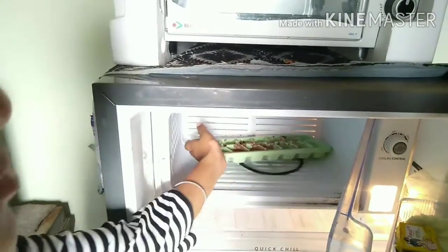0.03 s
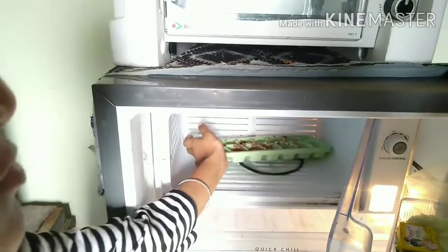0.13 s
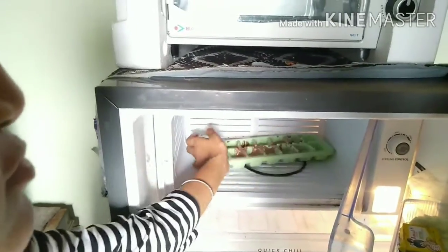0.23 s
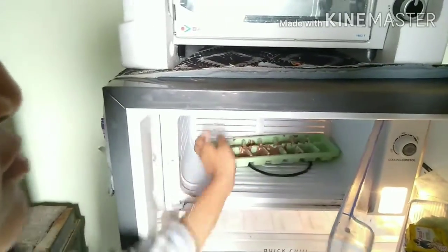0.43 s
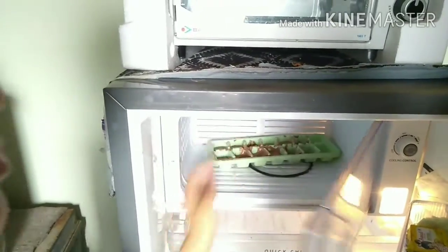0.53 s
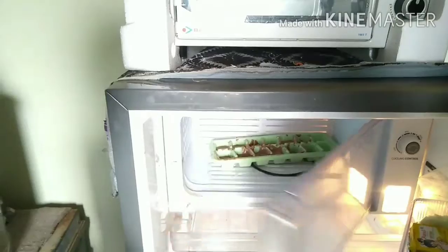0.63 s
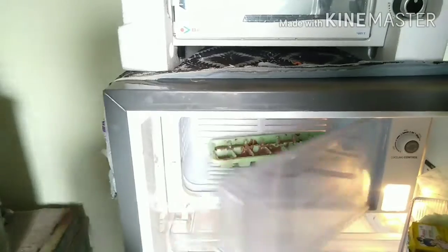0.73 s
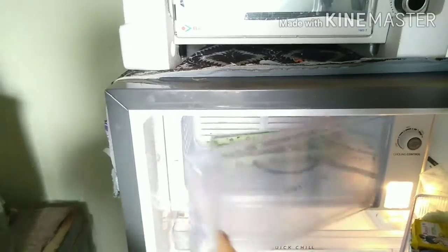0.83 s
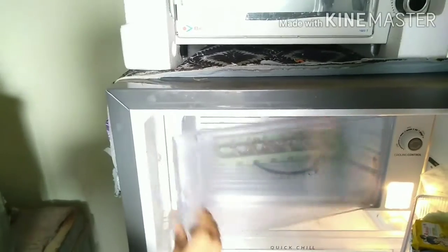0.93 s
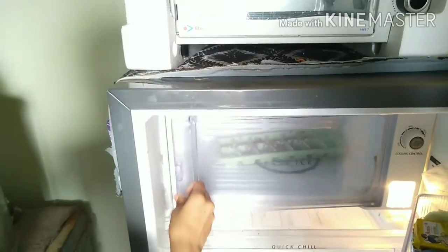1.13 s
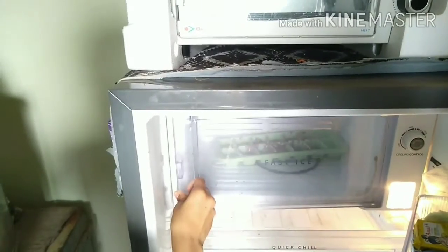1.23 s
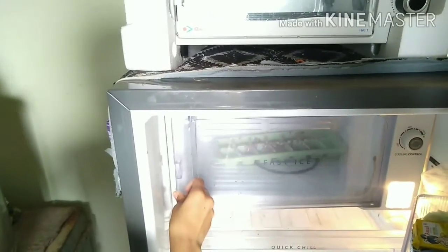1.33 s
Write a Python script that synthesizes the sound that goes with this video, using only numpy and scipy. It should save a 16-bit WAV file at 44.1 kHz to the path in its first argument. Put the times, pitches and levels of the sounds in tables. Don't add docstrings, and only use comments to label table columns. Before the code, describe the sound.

Close phone pickup in a hard, reverberant kitchen: a loud hollow plastic tray clatter, a short lull with soft rustles over low fridge hum, then a lighter flap knock with chatter and a faint latch click.

```python
import sys
import numpy as np
from scipy import signal
from scipy.fft import rfft, irfft
from scipy.io import wavfile
from scipy.ndimage import uniform_filter1d, map_coordinates

SR = 44100
rng = np.random.default_rng(int(sys.argv[2]) if len(sys.argv) > 2 else 0)


def log_audio(samples):
    frames = np.atleast_2d(samples).T
    limited = np.clip(frames, -1, 1)
    pcm = np.round(limited * 32767).astype(np.int16)
    wavfile.write(sys.argv[1], SR, pcm)


def nominal_scale(level):
    x = np.asarray(level, float) / 20
    return 10 ** x


N = 61739


def table(rows, hz, column=1):
    rows = np.array(rows, float)
    return np.interp(np.log(np.maximum(hz, 1)), np.log(rows[:, 0]), rows[:, column])


def unit(x):
    return x / np.sqrt(np.mean(x ** 2))


def noise(gain):
    spectrum = rfft(rng.standard_normal(N))
    return unit(irfft(spectrum * gain(np.fft.rfftfreq(N, 1 / SR)), N))


def band(hz, width_hz):
    return noise(lambda f: 1 / (1 + ((f - hz) / width_hz * 2) ** 2))


def walk(rate_hz):
    k = int(SR / rate_hz)
    steps = np.repeat(rng.standard_normal(N // k + 1), k)
    return unit(uniform_filter1d(uniform_filter1d(steps, k), k)[:N])


# frequency in Hz, level in dB.
HISS_COLOUR = [(25, -3), (70, -6.5), (200, -5.5), (600, -9), (1200, -12), (2800, -22), (11500, -29.5),
               (14000, -25)]
# centre in Hz, width in Hz, level in dB rms.
HUM_BANDS = [(100.6, 13, -72.5), (182.3, 14, -72), (238.7, 6.3, -76), (7900, 1900, -75), (14700, 900, -104),
             (3795, 73, -85.5)]


def hiss():
    swell_db = 0.4 * walk(7.1)
    edges_hz = [0, 150, 400, 1000, 2500, 6000, SR]
    freqs = np.fft.rfftfreq(N, 1 / SR)
    whole = rfft(noise(lambda f: nominal_scale(table(HISS_COLOUR, f))))
    bed = np.zeros(N)
    for lo, hi in zip(edges_hz, edges_hz[1:]):
        region = irfft(whole * (freqs >= lo) * (freqs < hi), N)
        bed += nominal_scale(swell_db + 0.7 * walk(12.5)) * region
    hum = sum(nominal_scale(db + 0.72 * walk(9.2)) * band(hz, width_hz) for hz, width_hz, db in HUM_BANDS)
    return nominal_scale(-59 - 2.5) * bed + hum


# centre in Hz, width in Hz, level in dB rms, strongest at in seconds, spread in seconds.
FAR_WHISTLE = (12050, 250, -83, .45, .33)


def whistle():
    hz, width_hz, db, peak_s, spread_s = FAR_WHISTLE
    flutter = nominal_scale(1.5 * walk(25))
    swell = np.exp(-.5 * ((np.arange(N) / SR - peak_s) / spread_s) ** 2)
    return nominal_scale(db) * flutter * band(hz, width_hz) * swell


def knocks(hits, modes, colour):
    LONGEST_T60_S, CRACK_T60_S, PUSH_S = 0.14, 0.03, 0.00041
    SCATTER_DB, FOCUS_DB_PER_OCT, MIC_LOW_HZ = 3, 12.5, 111
    out, t = np.zeros((2, N)), np.arange(N) / SR
    hz, mode_db, t60_s = (np.array(modes, float).T)[:, :, None]
    t60_s = np.clip(t60_s, .01, LONGEST_T60_S)
    crack = noise(lambda f: nominal_scale(table(colour, f)))
    for start_s, ring_db, focus_hz, crack_db in hits:
        mix, detune = rng.standard_normal((2, len(hz), 1))
        i = int(start_s * SR)
        u = t[i:i + SR // 2] - i / SR
        octaves_off = np.abs(np.log2(hz / focus_hz))
        share = nominal_scale(mode_db + SCATTER_DB * mix - FOCUS_DB_PER_OCT * octaves_off)
        tones = np.sin(2 * np.pi * hz * (1 + 0.0086 * detune) * u)
        rise = 1 - np.exp(-u * hz)
        ring = (share * tones * 1000. ** (-u / t60_s) * rise).sum(axis=0)
        snap = crack[i:i + len(u)] * 1000. ** (-u / CRACK_T60_S)
        push = 1 - np.exp(-u / PUSH_S)
        out[:, i:i + len(u)] += np.array([nominal_scale(ring_db) * ring, nominal_scale(crack_db) * snap]) * push
    return signal.sosfilt(signal.butter(2, MIC_LOW_HZ, "high", fs=SR, output="sos"), out)


# start in seconds, ring peak in dB, favoured pitch in Hz, crack in dB.
CORNER_HITS = [
    (.1778, -29, 470, -37.5),
    (.1806, -42, 470, -52),
    (.191, -36, 130, -55),
]
# frequency in Hz, level in dB, t60 in seconds.
CORNER_MODES = [(124.6, 4.5, 0.22), (226, -5, 0.077), (448, -0.5, 0.084), (695, -1, 0.038),
                (1053, 2, 0.058), (2000, 3, .04), (3550, 12, .035)]
# frequency in Hz, level in dB per Hz.
CORNER_CRACK = [(200, -1), (1000, 0), (2500, -6), (5000, -4.5), (7500, -6.5), (10000, -20), (13000, -14),
                (15700, -27)]


def corner_touch():
    return knocks(CORNER_HITS, CORNER_MODES, CORNER_CRACK)


# start in seconds, level in dB rms, centre in Hz, width in Hz, fade in seconds.
RUBS = [(.509, -59, 7000, 1200, .009), (.511, -66, 12050, 400, .012), (.796, -58, 1600, 800, .034),
        (.74, -60, 220, 140, .04), (.972, -71, 6000, 2000, .008), (1.022, -64, 1970, 160, .022),
        (1.055, -64, 1990, 110, .04), (1.382, -57, 15000, 1200, .003), (1.147, -57, 14800, 1400, .005),
        (.208, -48, 14900, 900, .006), (1.046, -60, 7500, 2500, .012), (.178, -54, 3500, 300, .006)]


def rustles():
    t, out = np.arange(N) / SR, np.zeros(N)
    for start_s, db, hz, width_hz, fade_s in RUBS:
        rise = np.clip((t - start_s) / 0.0016, 0, 1)
        fade = np.exp(-np.maximum(t - start_s, 0) / fade_s)
        out += nominal_scale(db) * band(hz, width_hz) * rise * fade
    return out


# frequency in Hz, t60 in seconds, level in dB.
KITCHEN_DECAY = [(107, 1, 1), (285, 0.78, -3.5), (600, 0.56, 5.5), (1500, 0.64, 0.5), (3450, 0.46, -0.5),
                 (6850, 0.36, -9), (14100, 0.21, 7.5)]


def kitchen():
    FIRST_ECHO_S, BUILD_S = 0.0053, 0.012
    t, out = np.arange(N) / SR, np.zeros(N)
    for hz in 60 * 2 ** (np.arange(25) / 3):
        level = np.sqrt(hz) * nominal_scale(table(KITCHEN_DECAY, hz, column=2))
        out += band(hz, hz / 4) * level * 1000. ** (-t / table(KITCHEN_DECAY, hz))
    out = out * np.clip((t - FIRST_ECHO_S) / BUILD_S, 0, 1)
    return out / np.sqrt(np.sum(out ** 2))


def echoes(knock, wet_db):
    ring_db, crack_db = -6, 4
    return nominal_scale(wet_db) * signal.fftconvolve(nominal_scale(np.array([ring_db, crack_db])) @ knock, kitchen())


# start in seconds, ring peak in dB, favoured pitch in Hz, crack in dB.
RATTLE_HITS = [(.2037, -29, 1400, -30.5), (.2096, -13, 1085, -21.5), (.2132, -19, 1130, -30.5),
               (.2145, -23.5, 680, -47), (.2165, -20, 487, -39), (.2205, -31, 1470, -21),
               (.2275, -24, 600, -33.5), (.2395, -17.5, 557, -32.5), (.2445, -37, 1660, -36),
               (.257, -27.5, 228, -34.5), (.2676, -31, 1100, -56), (.262, -28, 228, -62),
               (.212, -28.5, 134, -65), (.277, -22.5, 500, -49), (.282, -32, 1140, -39),
               (.2305, -29, 1040, -36), (.292, -37, 1080, -44), (.301, -29.5, 523, -49),
               (.322, -30, 497, -59), (.336, -38.5, 1160, -64), (.365, -40, 793, -67),
               (.388, -40, 1030, -53), (.385, -42, 125, -66)]
# frequency in Hz, level in dB, t60 in seconds.
RATTLE_MODES = [(116.3, 5, 0.17), (228, -3, 0.12), (345, -6, 0.037), (470, -2.5, 0.05), (529.5, -5, 0.13),
                (662, -19, 0.036), (793, -4.5, 0.063), (1058.6, -12, 0.16), (1121, -1.5, 0.039),
                (1420, -0.5, 0.035), (1630, -6, 0.058), (1970, -7.5, 0.08), (2570, -10, 0.043),
                (3320, -10, 0.026)]
# frequency in Hz, level in dB per Hz.
RATTLE_CRACK = [(100, -9.5), (500, 3), (1200, -3), (2500, -13), (6000, -18.5), (8500, -18.5),
                (12500, -29.5), (15200, -36.5)]


def tray_rattle():
    return knocks(RATTLE_HITS, RATTLE_MODES, RATTLE_CRACK)


# time in seconds, pitch in Hz, level in dB.
HINGE_HUM = [
    (.58, 339, -84),
    (.63, 343, -62),
    (.72, 345, -67),
    (0.801, 368, -63),
    (.92, 392.7, -66),
    (1.0, 403.5, -67),
    (1.07, 392.7, -61.5),
    (1.13, 402, -66),
    (1.161, 395, -100),
]
# multiple of the pitch, level in dB, strongest at in seconds, spread in seconds.
HINGE_OVERTONES = [(2, -3, .96, .03), (2, -5, 1.085, .03), (2, -4, .84, .02), (3, -7, .9, .04),
                   (5, -12, 1.033, .01), (5, -14, 1.07, .02)]


def hinge():
    t, (knot_s, knot_hz, knot_db) = np.arange(N) / SR, np.array(HINGE_HUM).T
    pitch_hz = np.interp(t, knot_s, knot_hz) * (1 + 0.00633 * walk(60.9))
    phase = 2 * np.pi * np.cumsum(pitch_hz) / SR
    tone = np.sin(phase) * nominal_scale(1.7 * walk(6.64))
    for multiple, db, peak_s, spread_s in HINGE_OVERTONES:
        level = nominal_scale(db + 4.5 + 2 * walk(47.9))
        swell = np.exp(-.5 * ((t - peak_s) / spread_s) ** 2)
        tone = tone + level * swell * np.sin(round(multiple) * phase)
    return tone * nominal_scale(np.interp(t, knot_s, knot_db, left=-120, right=-120))


# start in seconds, ring peak in dB, favoured pitch in Hz, crack in dB.
FRAME_HITS = [(1.1478, -31.5, 1720, -32.5), (1.1495, -35.5, 4400, -35.5), (1.1512, -30.5, 1700, -36.5),
              (1.155, -22.5, 470, -42), (1.1572, -24, 1540, -46), (1.1625, -32, 1020, -38.5),
              (1.165, -32, 1740, -44.5), (1.173, -50, 2750, -37.5), (1.1763, -25, 492, -49),
              (1.186, -36.5, 218, -40), (1.199, -36, 600, -44), (1.228, -43.5, 1745, -63),
              (1.232, -41, 480, -65), (1.275, -48, 550, -64)]
# frequency in Hz, level in dB, t60 in seconds.
FRAME_MODES = [(130, 2.5, .14), (213, 4.5, 0.15), (451, -4, 0.082), (486, 1.5, 0.039), (594, -4.5, 0.13),
               (1020, -11.5, 0.075), (1540, -0.5, 0.039), (1757, -3.5, 0.069), (2720, -18, 0.013),
               (3430, -2, 0.034), (4400, 3.5, 0.022), (4944, 0, .02), (6800, 9, 0.017), (7980, 7.5, 0.016)]
# frequency in Hz, level in dB per Hz.
FRAME_CRACK = [(100, -5.5), (450, -3.5), (800, -6.5), (2200, -3), (4800, -8.5), (8000, -15.5),
               (11000, -33.5), (15700, -41)]


def flap_knock():
    return knocks(FRAME_HITS, FRAME_MODES, FRAME_CRACK)


# start in seconds, ring peak in dB, favoured pitch in Hz, crack in dB.
CATCH_HITS = [
    (1.3836, -51, 1500, -43),
    (1.3852, -45, 1800, -44),
    (1.388, -43, 1010, -48),
    (1.391, -40, 1350, -48.5),
    (1.3938, -28.5, 1370, -52),
    (1.3965, -36, 1000, -52),
]
# frequency in Hz, level in dB, t60 in seconds.
CATCH_MODES = [(1024, -1, 0.054), (1370, -0.5, 0.031), (1800, -2, 0.043), (420, -8, .07), (233, 8, 0.072),
               (586, -4, .05)]
# frequency in Hz, level in dB per Hz.
CATCH_CRACK = [(300, 4.5), (1600, -2), (2850, -13), (5300, -18), (6800, -9.5), (9000, -21.5),
               (13000, -22.5), (15200, -21)]


def latch():
    return knocks(CATCH_HITS, CATCH_MODES, CATCH_CRACK)


# centre in Hz, width in Hz, lift in dB.
PORT_PEAKS = [(15500, 760, 12.5), (8030, 1400, 3.5), (6240, 200, 4)]


def port(x):
    for hz, width_hz, db in PORT_PEAKS:
        b, a = signal.iirpeak(hz, hz / width_hz, fs=SR)
        x = x + (nominal_scale(db) - 1) * signal.lfilter(b, a, x)
    return x


def scene():
    DRIFT_S, DRIFT_RATE_HZ = .00015, 45
    tray = tray_rattle() + corner_touch()
    flap = flap_knock() + latch()
    wet = echoes(tray, wet_db=-6.5) + echoes(flap, wet_db=-7.5)
    read_at = np.arange(N) + DRIFT_S * SR * walk(DRIFT_RATE_HZ)
    wet = map_coordinates(wet, [read_at], mode="nearest")
    quiet = hinge() + rustles() + hiss() + whistle()
    return (port((tray + flap).sum(axis=0) + wet) + quiet)[None]


def top_cut(x):
    return signal.sosfilt(signal.butter(12, 16780, fs=SR, output="sos"), x)


def record(dry):
    low_pass = signal.ellip(10, .5, 90, 15600, fs=SR, output="sos")
    mix = signal.sosfilt(low_pass, dry)
    return top_cut(mix)


dry = scene()
out = record(dry)
log_audio(out)
```